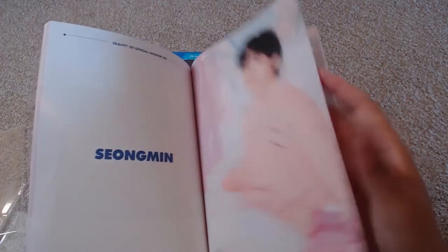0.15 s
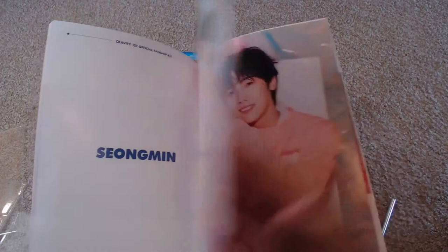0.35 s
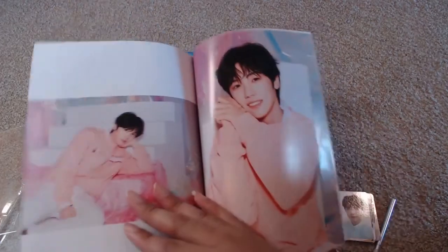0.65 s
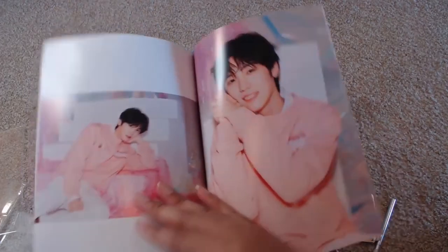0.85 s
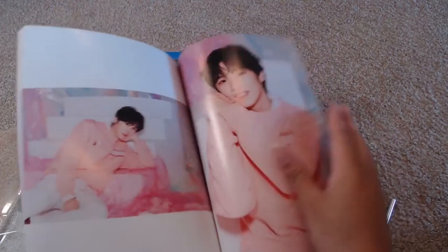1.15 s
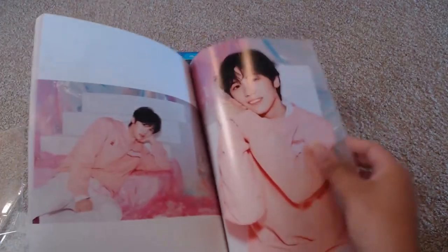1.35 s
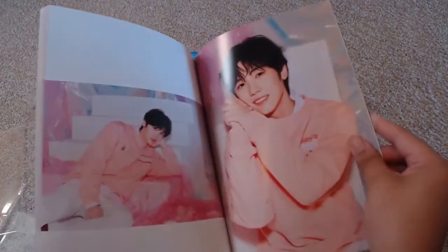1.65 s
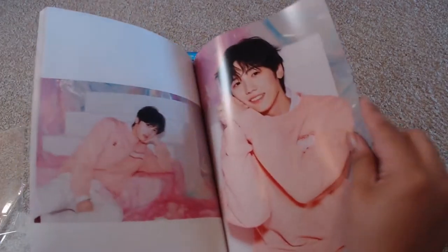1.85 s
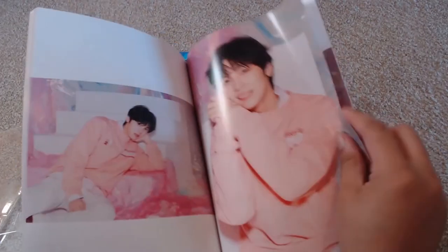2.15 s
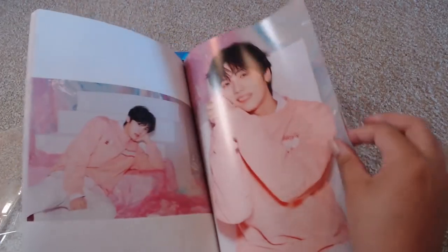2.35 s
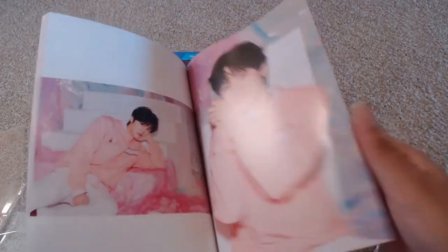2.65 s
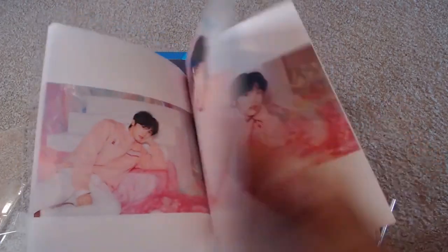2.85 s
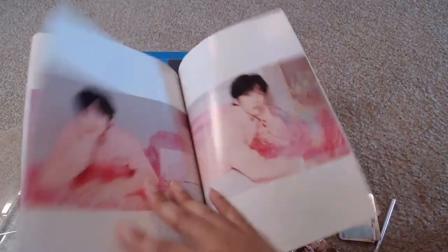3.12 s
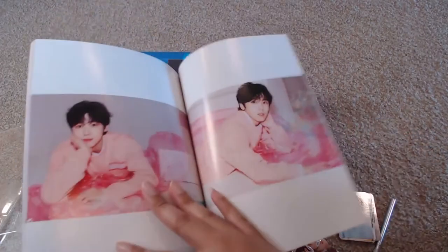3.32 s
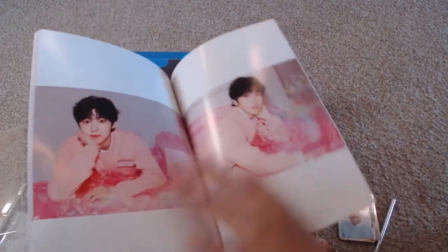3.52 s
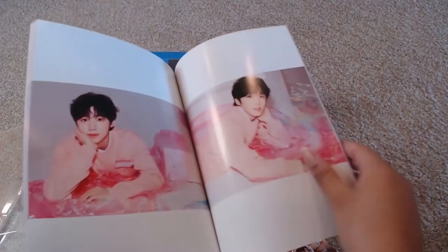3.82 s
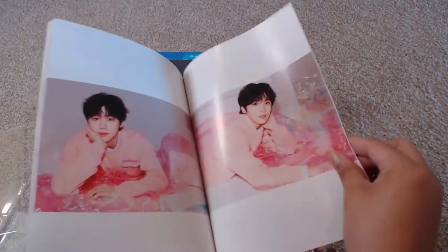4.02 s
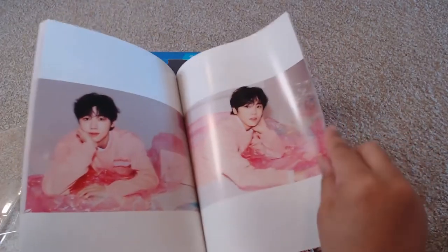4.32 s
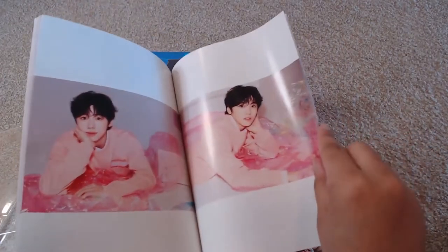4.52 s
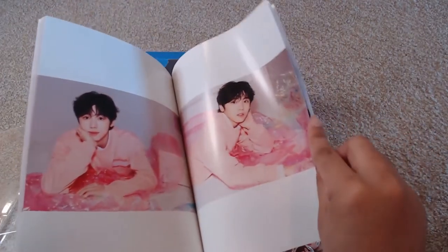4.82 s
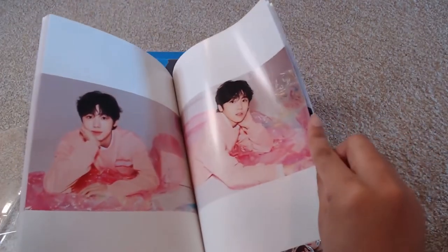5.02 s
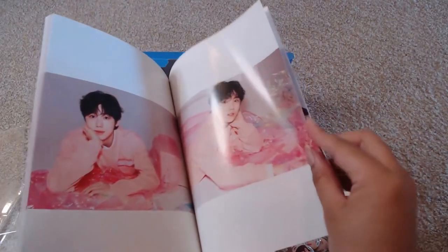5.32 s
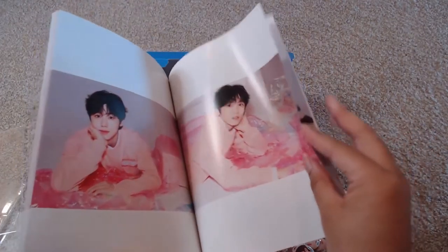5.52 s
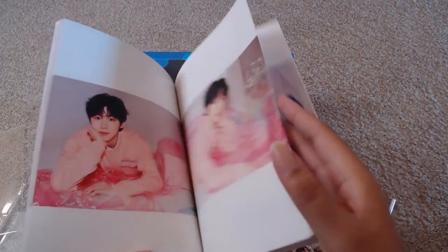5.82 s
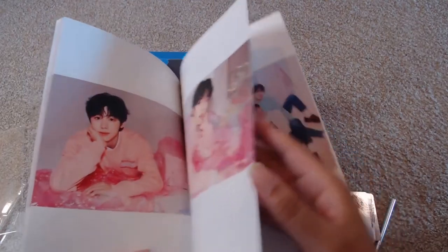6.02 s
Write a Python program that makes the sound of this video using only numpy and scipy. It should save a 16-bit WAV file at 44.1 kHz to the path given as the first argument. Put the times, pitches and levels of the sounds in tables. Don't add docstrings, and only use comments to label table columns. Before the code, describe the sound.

A hand leafs through a thick glossy book close to a small microphone in a quiet carpeted room. Crisp snaps and swishing paper open the scene, strongest around half a second; thumb rubs and ticks follow, another burst of cracks comes near two seconds, then a page swings over. Later there are dull flexing pops and faint rustles above a low building drone.

```python
import sys
import numpy as np
from scipy import signal
from scipy.fft import rfft, irfft, next_fast_len
from scipy.io import wavfile
from scipy.ndimage import uniform_filter1d, map_coordinates

SR = 44100
rng = np.random.default_rng(int(sys.argv[2]) if len(sys.argv) > 2 else 0)


def ratio(d):
    e = np.asarray(d, float) / 20
    return 10 ** e


def master_out(mix):
    frames = np.transpose(np.atleast_2d(mix))
    ceiling = np.clip(frames, -1, 1)
    pcm = np.round(ceiling * 32767).astype(np.int16)
    wavfile.write(sys.argv[1], SR, pcm)


N = 272097

# (frequency [Hz], level [dB rms])
MOTORS = [(27.75, -27), (28.08, -33)]
# (time [s], level [dB])
MAINS_HUM = [(0.0, -59), (0.03, -58), (0.58, -38), (0.67, -63), (0.88, -41), (1.18, -49), (1.24, -42),
             (1.51, -47), (2.44, -41), (2.54, -57), (2.68, -43), (3.28, -48.5), (3.44, -46), (5.21, -47.5),
             (5.24, -64), (5.34, -45.5), (6.03, -54.5), (6.17, -40)]
# (frequency [Hz], level [dB rms])
ELECTRONIC_WHINES = [(10050, -92), (12554, -92), (14416, -95)]
# (frequency [Hz], level [dB])
AIR_SPECTRUM = [(3, -43), (6, -7.5), (20, -7), (37, -0.5), (46, -11), (72, -21.5), (112, -15.5),
                (135, -25.5), (250, -33.5), (900, -42.5), (1500, -57), (5600, -65.5), (9000, -76),
                (16000, -73)]

# (fastest moment [s], rise [s],
# fall [s], level [dB], brightness [dB])
PAPER_SLIDES = [(.065, .02, .1, -52, -4), (.12, 0.15, 0.084, -50, 1), (.285, .025, 0.15, -46, 5),
                (.33, 0.076, 0.083, -47.5, 7), (.43, .1, 0.11, -61.5, 14), (1.08, 0.13, 0.045, -65, 11),
                (.485, .02, .15, -60, -4), (.575, 0.15, 0.069, -44.5, 5), (.81, 0.45, .1, -63, 5),
                (.95, 0.19, 0.25, -50.5, 6.5), (2.74, 0.13, .04, -58.5, 2), (2.85, 0.029, 0.25, -48.5, -8),
                (3.18, 0.23, 0.072, -51, 0.5), (3.282, .01, 0.052, -57.5, 10.5), (3.35, .02, 0.26, -57.5, 7),
                (3.48, 0.048, 0.39, -58.5, 4), (3.61, 0.3, 0.13, -63.5, 12), (3.71, .015, 0.072, -57, 5.5),
                (5.73, 0.11, 0.12, -60, -8), (5.89, 0.086, 0.34, -62.5, -3), (6.1, .5, .5, -67, 1),
                (1.31, .15, 0.087, -54, 5.5), (1.43, .1, 0.24, -58.5, 4.5), (1.84, 0.39, .05, -54.5, 4),
              (1.93, 0.081, 0.082, -39.5, 2), (2.03, .1, .2, -63, -4), (2.15, 0.075, 0.15, -41.5, -15),
              (2.26, 0.11, 0.14, -54, 6), (2.469, 0.019, 0.18, -48.5, -6), (2.52, 0.07, 0.15, -53.5, 1),
              (2.62, .1, 0.044, -54, 6), (3.95, 0.1, 0.17, -66.5, 9.5), (4.04, .2, .2, -72, -4),
              (4.25, 0.37, .11, -54, -10), (4.38, 0.033, 0.17, -54.5, -6), (4.7, .19, 0.17, -58, -13),
              (4.966, .03, 0.076, -57, 2.5), (5.2, 0.082, 0.5, -57.5, -8), (5.42, 0.33, 0.13, -56.5, 8),
              (5.58, .3, .12, -62.5, -1)]
# (deepest bend [s], rise [s], fall [s], level [dB])
SHEET_BENDS = [(.12, 0.18, .1, -51.5), (.3, 0.03, 0.18, -48), (.58, 0.22, 0.063, -48.5),
               (.85, 0.39, .3, -62.5), (1.07, .5, 0.16, -57), (1.31, 0.26, 0.17, -57.5),
               (1.45, .15, .5, -59), (1.8, 0.54, 0.15, -56), (1.9, 0.045, .3, -49.5),
               (2.02, 0.11, 0.066, -43.5), (2.15, 0.16, 0.34, -53), (2.27, 0.23, 0.045, -50.5),
               (2.48, 0.049, 0.33, -51.5), (2.62, .3, 0.05, -55.5), (2.74, .3, 0.14, -70),
               (2.85, 0.081, 0.57, -54.5), (3.18, .5, 0.19, -58.5), (3.42, 0.24, 0.19, -59),
               (3.73, 0.17, 0.099, -57.5), (3.87, .3, .15, -63), (4.25, 0.33, .11, -50.5),
               (4.4, .12, 0.24, -58.5), (4.7, 0.32, 0.24, -56), (5.2, 0.71, 0.95, -59.5),
               (5.6, 0.41, 1, -61.5), (5.89, 0.15, 0.25, -61.5), (6.16, .6, .3, -62)]
# (gloss level [dB], sheet level [dB], edge level [dB])
RESTING_HAND = (-76, -88.5, -75)

# (frequency [Hz], level [dB])
GLOSS_SPECTRUM = [(1500, -14), (2800, 0), (4300, 1.5), (5600, -1), (7000, -2), (9000, -8.5), (12000, -21)]
SHEET_SPECTRUM = [(400, -14.5), (900, 2), (1400, 2.5), (2100, 2.5), (2800, -4), (4500, -29)]
FLOP_SPECTRUM = [(350, -11.5), (800, 1), (1300, 3.5), (2000, 5.5), (2800, -0.5), (4500, -38.5)]
EDGE_SPECTRUM = [(5000, -37.5), (8500, 9.5), (10500, 5), (13000, -3), (15500, -7), (16500, -37)]

# (frequency [Hz], decay by 60 dB [s])
ROOM_DECAY = [(200, 0.44), (1400, 0.093), (4000, 0.21), (10000, 0.19)]

# (time [s], crack level [dB], flop level [dB], edge level [dB], rattle level [dB])
EDGE_SNAPS = [(0.0525, -26.5, -43.5, -62, -9.5), (0.1069, -23, -40.5, -69, -21),
              (0.2349, -36.5, -46.5, -53, -7.5), (.477, -29, -38, -40, -19),
              (.5612, -18.5, -33, -37, -12.5), (0.5628, -20, -38, -35, -24), (1.9164, -26, -44, -54, -22),
              (1.927, -51, -41.5, -56, -2.5), (1.9922, -22, -38.5, -32, -14),
              (2.02, -26.5, -35, -48, -10.5), (2.0945, -56, -37.5, -45, -8.5),
              (2.123, -21.5, -63, -36.5, -7.5), (2.826, -36, -47, -60, -7), (3.1702, -28, -51, -56, -16.5),
              (3.1809, -29, -45, -36, -22), (4.1677, -31.5, -40, -62, -8),
              (4.2518, -23.5, -33.5, -57, -14.5), (4.433, -25.5, -33.5, -52, -13),
              (4.6464, -19, -31, -57, -15.5), (4.9626, -39.5, -51, -48, -9), (4.973, -33, -46, -78, -18),
              (5.359, -25, -42.5, -55, -13.5), (2.89, -54, -58, -49, -8), (6.113, -33.5, -39, -68, -10)]
# (time [s], crack level [dB], flop level [dB])
NAIL_TICKS = [(0.2703, -31, -54), (.322, -33, -45), (0.5768, -33, -46), (0.593, -35, -51),
              (1.269, -39, -54), (1.4157, -41, -58), (1.584, -37.5, -48), (1.6517, -41, -47),
              (1.672, -36, -55), (1.7474, -47, -49), (1.7649, -38, -58), (2.21, -34, -43),
              (2.445, -38, -56), (3.019, -38, -63), (3.1163, -47.5, -50), (4.4443, -44, -40),
              (3.34, -55, -57), (3.5553, -30.5, -45.5), (3.703, -40, -56), (4.075, -34.5, -48),
              (4.124, -34, -44), (4.226, -36, -58), (4.593, -60, -52), (5.392, -33, -43.5),
              (5.5702, -41.5, -67), (5.715, -50.5, -48), (5.878, -43.5, -52), (5.9935, -36, -45),
              (6.061, -33.5, -45.5), (6.091, -36, -43.5)]
# (time [s], level [dB], air-cushion frequency [Hz], decay by 60 dB [s])
LANDINGS = [(.055, -45, 282, 0.061), (.18, -42.5, 500, 0.2), (0.559, -39, 220, 0.1), (.56, -33, 453, 0.13),
            (.575, -32, 513, 0.089), (.587, -30, 900, 0.06), (1.582, -44, 494, 0.081),
            (1.652, -32.5, 277, 0.11), (1.652, -31.5, 510, 0.047), (1.667, -42, 643, 0.12),
            (2.124, -38.5, 320, 0.11), (2.517, -39, 260, 0.041), (3.139, -35.5, 260, 0.042),
            (3.555, -38, 246, 0.039), (3.943, -30.5, 280, 0.11), (3.945, -37.5, 830, 0.056),
            (3.965, -39, 690, 0.11), (1.652, -39, 1230, 0.039), (4.251, -36, 337, 0.055),
            (4.433, -31.5, 320, 0.069), (4.646, -30.5, 288, 0.093), (4.648, -34.5, 696, 0.16),
            (5.993, -41, 250, .08)]
# (time [s], length [s], frequency [Hz], level [dB])
SKIN_CATCHES = [
    (2.585, .03, 1800, -51),
    (2.975, .05, 1600, -55),
    (3.39, .03, 3200, -60),
    (.562, .0035, 5600, -33),
    (1.285, .04, 6100, -58),
    (1.9, .02, 5200, -45),
    (1.925, .02, 2900, -46),
    (2.125, .035, 3000, -49),
    (2.86, .06, 4900, -56),
]


def unit(x):
    return x / np.sqrt(np.mean(x ** 2) + 1e-20)


def along(points, hz):
    f, v = np.transpose(points)
    return np.interp(np.log(hz + 1), np.log(f + 1), v)


def wobble(rate):
    knots = rng.standard_normal(int(N * rate / SR) + 4)
    return map_coordinates(knots, [np.arange(N) * rate / SR])


def coloured(x, spectrum):
    size = next_fast_len(N + SR // 2) * 2
    gain = ratio(along(spectrum, np.fft.rfftfreq(size, 1 / SR)))
    cepstrum = irfft(np.log(unit(gain)), size)
    cepstrum[1:size // 2] *= 2
    cepstrum[size // 2 + 1:] = 0
    return irfft(rfft(x, size) * np.exp(rfft(cepstrum)), size)[:N]


def building():
    t = np.arange(N) / SR
    in_step_s = 4.02
    motors = sum(ratio(db + 1.5) * np.cos(2 * np.pi * hz * (t - in_step_s)) for hz, db in MOTORS)
    whines = sum(ratio(db + 1.0 + 1.1 * wobble(2.927)) * np.sin(2 * np.pi * hz * t)
                 for hz, db in ELECTRONIC_WHINES)
    hum_db = np.interp(t, *np.transpose(MAINS_HUM)) + 2.5
    hum = ratio(hum_db) * np.sin(2 * np.pi * 120 * t)
    air = ratio(-35.5) * coloured(rng.standard_normal(N), AIR_SPECTRUM)
    return motors + hum + whines + air


def patchy(patchy_db):
    z = signal.stft(rng.standard_normal(N), nperseg=512)[2]
    field = uniform_filter1d(rng.standard_normal(z.shape), size=3, axis=0)
    field = uniform_filter1d(field, size=6, axis=1)
    return unit(signal.istft(z * ratio(patchy_db * unit(field)), nperseg=512)[1][:N])


def strokes(rows, lift_db, rest_db, grows=1):
    t = np.arange(0, N / SR + .01, .002)
    span_db = 15
    roundness = 1.08
    power = ratio(2 * rest_db)
    for (s, rise, fall, db, *_), lift in zip(rows, lift_db):
        distance = np.where(t < s, (s - t) / rise, (t - s) / fall)
        power = power + ratio(2 * (db + lift - grows * span_db * distance ** roundness))
    return np.interp(np.arange(N) / SR, t, np.sqrt(power))


def rubbing():
    slides = PAPER_SLIDES
    gloss_rest, sheet_rest, edge_rest = RESTING_HAND
    gloss = strokes(slides, np.zeros(len(slides)), gloss_rest)
    sheet = strokes(SHEET_BENDS, np.zeros(len(SHEET_BENDS)), sheet_rest)
    edge = strokes(slides, -10 + np.transpose(slides)[4], edge_rest, grows=1.46)

    slip_now = rng.random(N) < 900 / SR
    slip_size = ratio(1.1 * np.minimum(rng.exponential(size=N), 3))
    slips = 0.33 * unit(slip_now * slip_size * rng.standard_normal(N))
    grip = ratio(1.2 * wobble(25) + 1.2 * wobble(70) - 3.5)
    bands = zip((gloss, sheet, edge), (GLOSS_SPECTRUM, SHEET_SPECTRUM, EDGE_SPECTRUM))
    return sum(level * grip * coloured(patchy(patchy_db=3.5) + slips, body) for level, body in bands)


def room(x):
    hz, t, z = signal.stft(rng.standard_normal(SR // 2), SR, nperseg=256)
    decay = ratio(-60 * t / along(ROOM_DECAY, hz)[:, None])
    tail = signal.istft(z * decay, SR, nperseg=256)[1]
    delayed = np.pad(x, (200, 0))
    return signal.fftconvolve(delayed, tail / np.linalg.norm(tail))[:N]


def snaps():
    push = np.zeros((3, N + SR))
    t = np.arange(SR // 5) / SR
    tick_edge_db, tick_rattle_db = -23, -14
    rattle_s, rattle_grit_db = 0.037, 2.5
    ticks = [(s, db, flop_db, db + tick_edge_db, tick_rattle_db) for s, db, flop_db in NAIL_TICKS]
    for s, crack_db, flop_db, edge_db, rattle_db in EDGE_SNAPS + ticks:
        noise = rng.standard_normal((3, len(t)))
        grit = unit(uniform_filter1d(noise[2], size=50))
        noise[1] *= unit(ratio(rattle_grit_db * grit))
        crack = 0.46 * noise[0] * ratio(-60 * t / 0.021) * (1 - np.exp(-t / 0.00013))
        crack[round(.0008 * SR)] = -6
        rattle_level = ratio(rattle_db + np.array([[0.0], [-4.0], [0.0]]))
        rattle = rattle_level * noise[1] * np.exp(-(t / rattle_s) ** 2)
        level = ratio(np.array([[crack_db - 11.5], [flop_db + 3.0], [edge_db - 3.5]]))
        push[:, round(s * SR):][:, :len(t)] += level * (crack + rattle)
    bodies = (GLOSS_SPECTRUM, FLOP_SPECTRUM, EDGE_SPECTRUM)
    return sum(coloured(p[:N], body) for p, body in zip(push, bodies))


def thumps():
    out = np.zeros(N + SR)
    t = np.arange(SR // 5) / SR
    for s, db, hz, t60 in LANDINGS:
        dull = signal.butter(1, [hz * .6, hz * 1.9], "bandpass", fs=SR, output="sos")
        ring = np.sin(2 * np.pi * hz * t) * ratio(-60 * t / .025)
        puff = unit(signal.sosfilt(np.vstack([dull, dull]), rng.standard_normal(len(t))))
        puff = 0.4 * puff * ratio(-60 * t / t60)
        onset = 1 - np.exp(-t / .0006)
        out[round(s * SR):][:len(t)] += ratio(db + 1) * onset * (ring + puff)
    return out[:N]


def squeaks():
    t = np.arange(N) / SR
    shake = 2.1 * wobble(160)
    out = np.zeros(N)
    for s, life, hz, db in SKIN_CATCHES:
        swell = np.exp(-((t - s - life / 2) / (life / 2)) ** 2)
        out += ratio(db) * swell * np.sin(2 * np.pi * hz * t + shake)
    return out


def scene():
    book = rubbing() + snaps() + thumps() + squeaks()
    return (book + ratio(-14) * room(book) + building())[None]


def roll_off(x):
    return signal.sosfilt(signal.butter(12, 16510, fs=SR, output="sos"), x)


def record(dry):
    hz = np.fft.rfftfreq(N, 1 / SR)
    port_hz, width_hz, top_hz = 5600, 1100, 15900
    port = 1 + .5j * hz * width_hz / (port_hz ** 2 - hz ** 2 + 1j * hz * width_hz)
    mix = irfft(rfft(dry) * port * (hz < top_hz), N)
    return roll_off(mix)


dry = scene()
out = record(dry)
master_out(out)
```